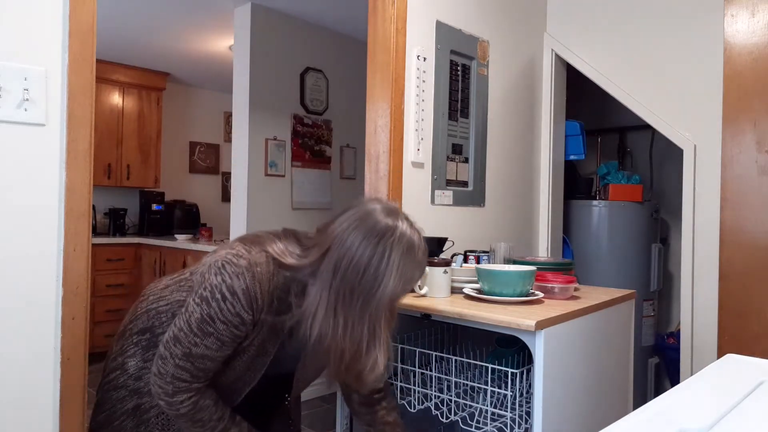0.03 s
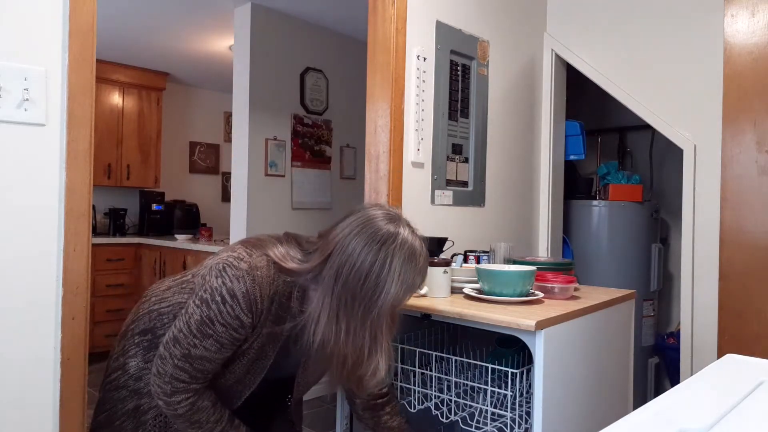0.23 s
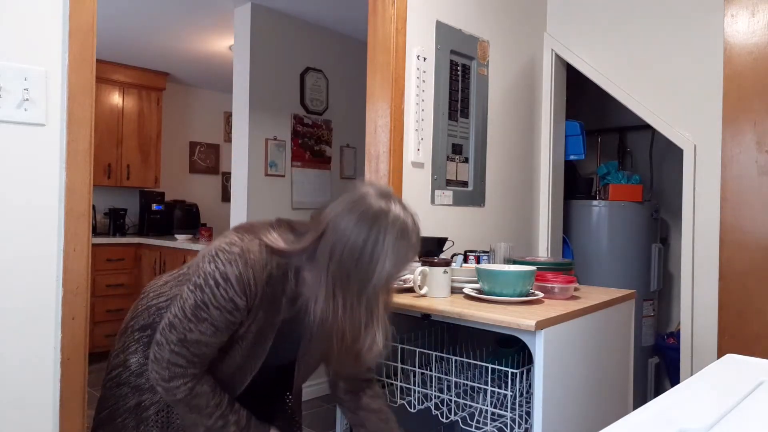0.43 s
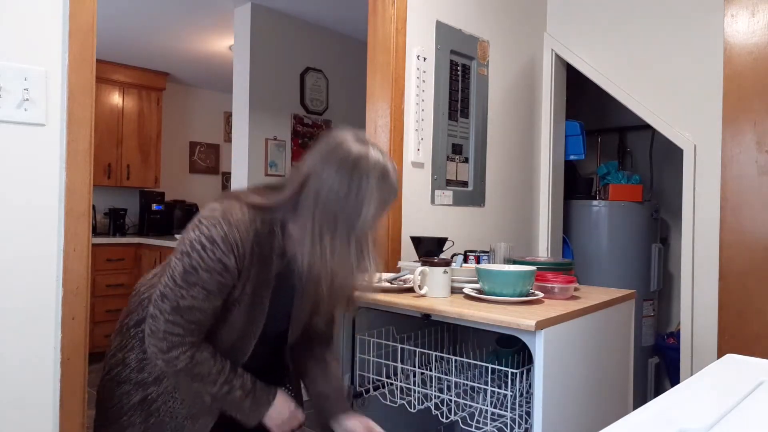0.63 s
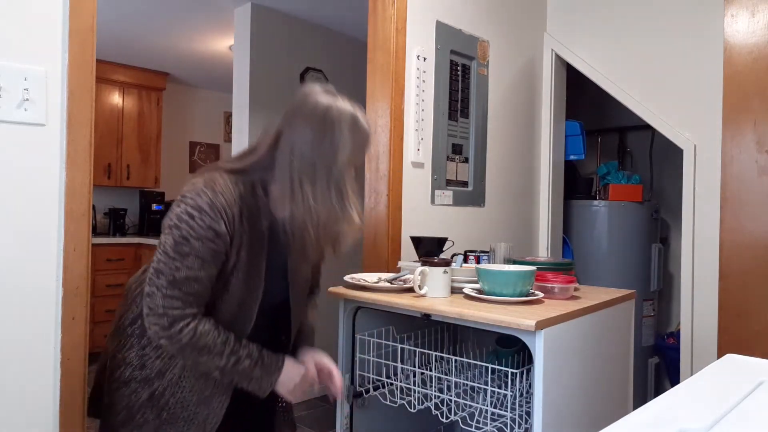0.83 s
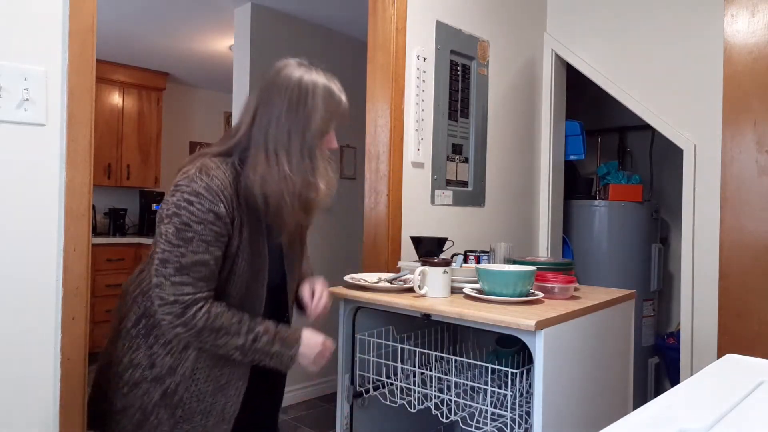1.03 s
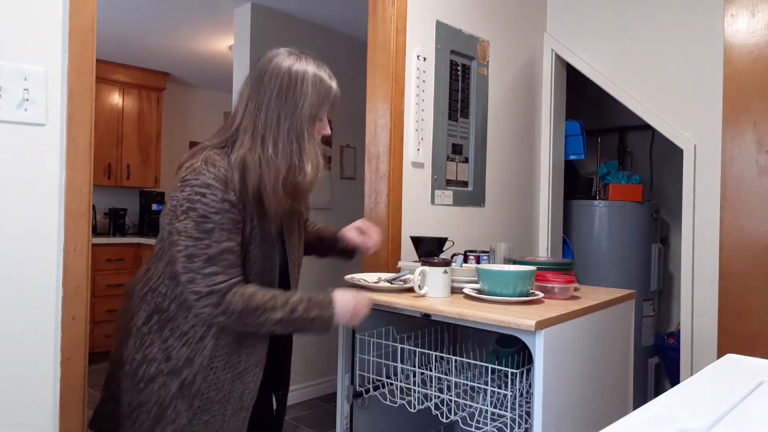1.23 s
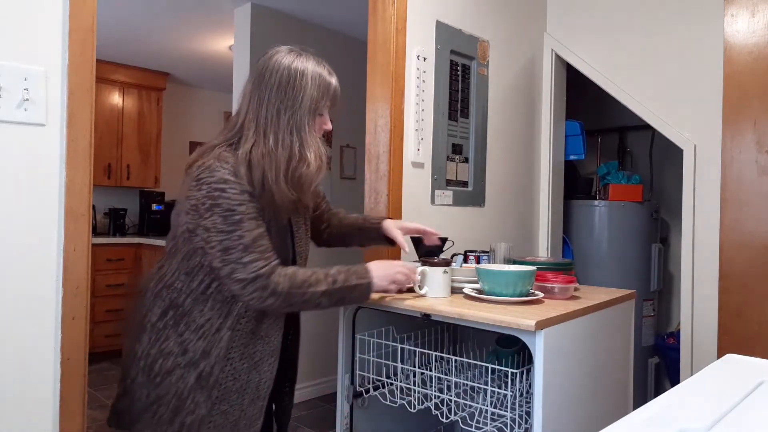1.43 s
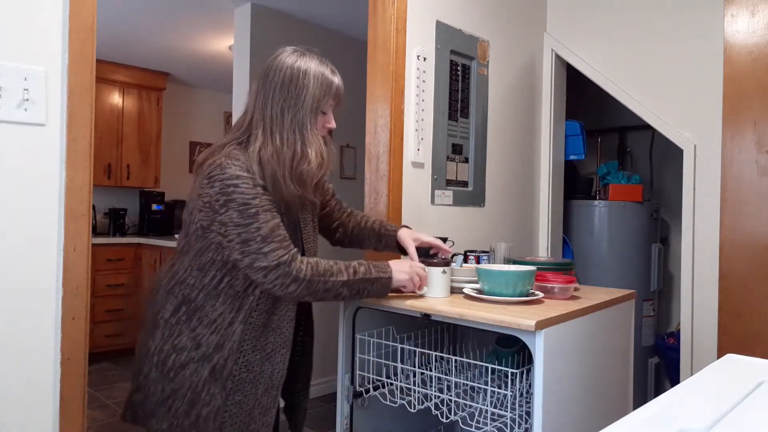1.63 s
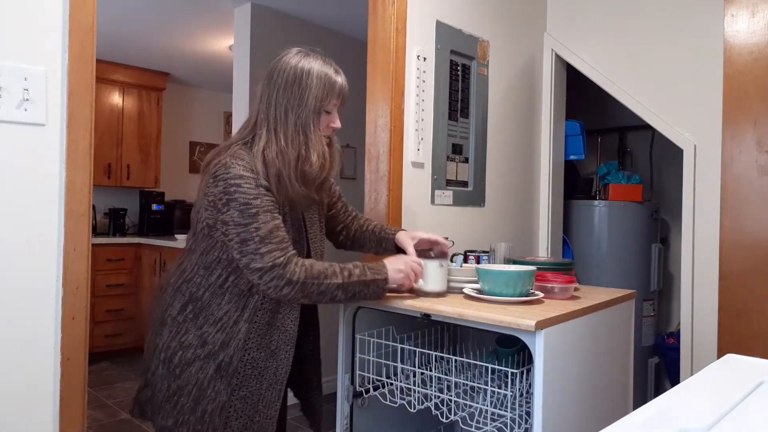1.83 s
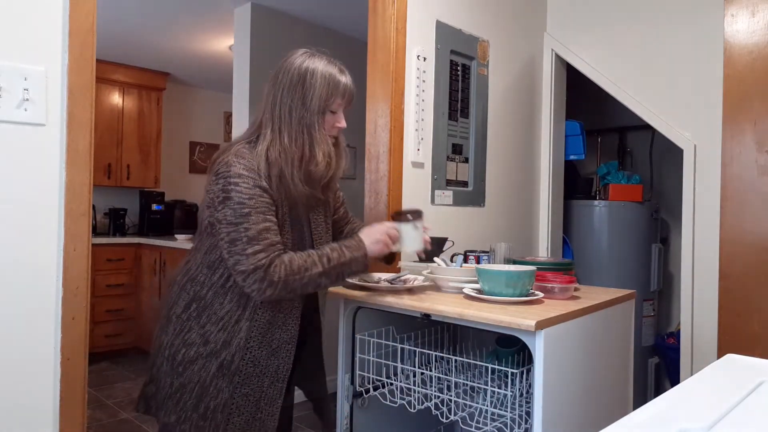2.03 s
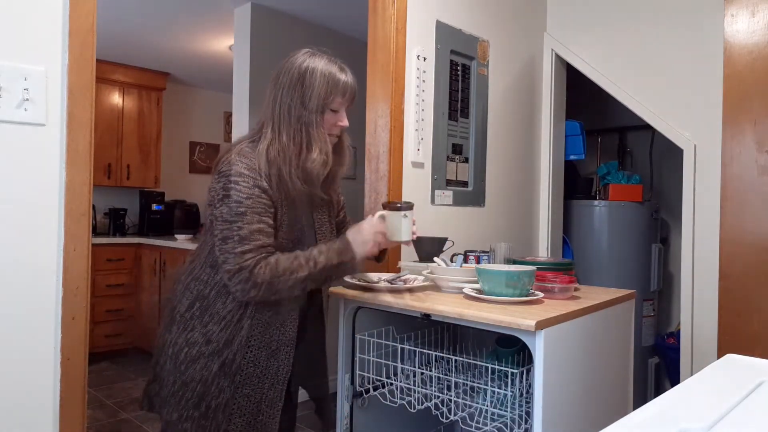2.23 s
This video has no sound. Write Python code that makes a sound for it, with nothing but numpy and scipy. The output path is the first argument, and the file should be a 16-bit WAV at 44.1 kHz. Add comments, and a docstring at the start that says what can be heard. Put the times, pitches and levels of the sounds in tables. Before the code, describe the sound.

In a kitchen, heard from a few metres off, cutlery drops into a dishwasher after light bumps on the rack. A sleeve swishes softly, dishes knock, a cup clacks, the counter thuds, and a mug clinks before a plate rattles briefly.

```python
"""Light bumps on the rack of an open dishwasher, then cutlery drops into its basket, a few metres
from a stereo pair of microphones in a live kitchen. A sleeve swishes, dishes are nudged on the wooden
counter, a hollow cup clacks and the counter thuds. A lifted mug clinks and leaves a plate chattering.
Every contact is a click with small rebounds that sets the object ringing; faint room tone lies below."""
import sys
import numpy as np
from scipy import signal
from scipy.fft import rfft, irfft, next_fast_len
from scipy.io import wavfile
from scipy.ndimage import uniform_filter1d

SR = 44100
rng = np.random.default_rng(int(sys.argv[2]) if len(sys.argv) > 2 else 0)


def unload_wav(signal):
    """Save mono or channel-first audio to the path in sys.argv[1] as 16-bit WAV at rate SR, clipped to [-1, 1]."""
    wavfile.write(
        sys.argv[1],
        SR,
        np.round(np.clip(np.atleast_2d(signal).T, -1, 1) * 32767).astype(np.int16),
    )


N = 101429


def cutlery(spots=3):
    """Metal pieces land in the basket; later a fork clinks faintly on a plate. One track per spot."""
    hits = [(.212, -1.5, -1.5, -14.5, 0.0068), (.234, 1, 4, 0, 0.004), (.256, 0.5, 3.5, -6, 0.015),
            (.289, 7, 8.5, 1, 0.0081), (.312, 4, -19, -13, 0.01), (.335, 2, 3, 6.5, 0.0051),
            (.363, -1, 4.5, 6, .01), (.389, 0, 13, 1.5, 0.018), (.406, -0.5, -5.5, 4.5, 0.0054),
            (.424, 1.5, 5.5, 6, .012), (.45, 1.5, -0.5, 10.5, 0.0041), (.47, 3.5, 5, 2, 0.0058),
            (.5, -6.5, -3.5, -9, 0.018), (.55, -6, -12, -16, 0.011), (1.51, -17.5, -20.5, -36.5, 0.0026)]  # start_s, bass_db, middle_db, treble_db, rebound_s
    knock = [(30, -17.5), (55, -7), (130, 1), (230, 0), (500, 1), (1000, 1.5), (2500, 1.5), (5300, -5),
             (8000, -2.5), (12000, -1), (16000, -7.5)]  # knock colour: frequency_hz, level_db
    modes = [(301.8, 16, 0.19), (779, 4, 0.13), (1598, 1, .02), (1755, -2, 0.015), (4480, 10, 0.016),
             (6171.3, 7, 0.05), (6530, 4, .04), (7980, 3.5, 0.016), (8490, 8.5, 0.021), (10345, -14, 0.02),
             (11700, 6, .09), (13960, 3, 0.021), (14200, 8, 0.029), (14001, 5.5, .04)]  # pitch_hz, level_db, t60_s
    return [struck(hits[k::spots], knock, modes, own_modes=6) for k in range(spots)]


def rack():
    """The dishwasher rack hums briefly after each light bump."""
    bumps = [(.067, -14, -14.5, -29.5, 0.011), (.097, -4.5, -19.5, -38, 0.012), (.15, -16, -49, -42, 0.014),
             (.195, -28, -32, -28, 0.0083), (.61, -29, -18.5, -37, 0.03), (.68, -20.5, -24.5, -42, 0.022)]  # start_s, bass_db, middle_db, treble_db, rebound_s
    knock = [(30, -17.5), (110, 0), (220, -8), (500, -1.5), (1000, 0), (2300, 2), (3700, 4), (6000, 0.5),
             (10000, -3), (16000, -6.5)]  # knock colour: frequency_hz, level_db
    modes = [(320, 14, .14), (1643.8, 4, 0.034), (1997, 4.5, 0.028), (8600, 5, 0.0076)]  # pitch_hz, level_db, t60_s
    return struck(bumps, knock, modes)


def dishes():
    """Nudged dishes knock dully on the counter."""
    nudges = [(1.0, -9, -33.5, -43, 0.013), (1.176, -24.5, -20.5, -25.5, 0.021),
              (1.222, -15.5, -18.5, -24, 0.014), (1.262, -13, -26.5, -31, 0.031),
              (1.329, -12.5, -18.5, -46, 0.013), (1.378, -15.5, -16.5, -49, 0.011),
              (1.406, -18, -23, -21.5, .01), (1.426, -8.5, -20, -17, 0.017), (1.457, -9, -8.5, -30, 0.026),
              (1.5, -8.5, -8, -17, 0.011), (1.515, -1, -16, -95, 0.011), (1.55, -5, -17, -24, 0.037),
              (1.625, -19, -23, -44.5, 0.045)]  # start_s, bass_db, middle_db, treble_db, rebound_s
    knock = [(30, -23), (70, -9), (220, -6), (450, 1.5), (900, -1), (2000, 3), (3500, -4), (6500, -11.5),
             (10000, -14.5), (16000, -19)]  # knock colour: frequency_hz, level_db
    modes = [(166, 6.9, 0.19), (298, 15.7, .15), (821, 1.6, 0.015), (1030, 1.8, 0.036), (2670, 4.4, 0.015),
             (2820, 3, 0.046), (4970, 2, .04), (8500, 2, 0.0085)]  # pitch_hz, level_db, t60_s
    return struck(nudges, knock, modes)


def cup():
    """A hollow cup clacks, its strong modes dying fast."""
    clacks = [(1.703, -27, -12, -26, 0.0073), (1.72, -15, -16.5, -32, 0.0032),
              (1.737, -19, -16.5, -41, 0.0017)]  # start_s, bass_db, middle_db, treble_db, rebound_s
    knock = [(40, -10), (250, 5), (600, 6), (1500, 3.5), (3000, 6), (5000, -17), (9000, 3), (16000, -18.5)]  # knock colour: frequency_hz, level_db
    modes = [(520, 3.6, 0.037), (800, 13.4, 0.02), (921, 23.8, 0.035), (2809, 23.3, 0.11), (2886, 15, .07),
             (3850, 15.7, 0.028), (3790, 20, 0.041), (5064.3, 32.4, 0.044), (6470, 15, 0.033),
             (6940, 12, 0.0806), (7650, 8.4, 0.035), (8280, 8, 0.03307), (9242.5, 12.6, 0.059),
             (10751, 14, 0.061), (11900, 13, .06), (13780, 13, .08)]  # pitch_hz, level_db, t60_s
    return struck(clacks, knock, modes)


def counter():
    """The wooden counter thuds in its low modes."""
    thuds = [(1.79, 3, -1.5, -21, 0.0061), (1.801, 2, -1, -16.5, 0.0072), (1.819, -1.5, -8.5, -26, 0.013)]  # start_s, bass_db, middle_db, treble_db, rebound_s
    knock = [(30, -29), (65, -3.5), (130, -3.5), (200, 0.5), (400, -2.5), (650, -8.5), (1000, -4),
             (2300, -1), (4000, -8), (7000, -5.5), (12000, -2.5), (16000, -11.5)]  # knock colour: frequency_hz, level_db
    modes = [(144, 5, 0.14), (180, 2.8, 0.26), (314, 12.3, 0.076), (384.7, 4, 0.15), (627, 11.6, 0.061)]  # pitch_hz, level_db, t60_s
    return struck(thuds, knock, modes)


def mug():
    """A lifted mug clinks twice and rings high."""
    clinks = [(1.835, -9, -17, -11.5, 0.0027), (1.846, -8, -18, -19, 0.0089)]  # start_s, bass_db, middle_db, treble_db, rebound_s
    knock = [(100, 5), (1000, 9), (2600, 10.5), (5000, -2.5), (10000, -3.5), (16000, -5.5)]  # knock colour: frequency_hz, level_db
    modes = [(4856, 16.7, .1), (6520, 17, 0.075), (6900, 21, 0.12), (7930, 16, 0.12), (9000, 19, 0.022),
             (9330, 23, 0.0542), (10110, 20, 0.045), (12100, 18, 0.038), (12490, 13, 0.0676),
             (13600, 21, .1), (14000, 17, .1), (14350, 20, .1), (15130, 22, .1)]  # pitch_hz, level_db, t60_s
    return struck(clinks, knock, modes)


def plate():
    """A plate chatters in a fading run of knocks."""
    hits = [(1.86, 0, -6.5, -14, 0.033), (1.918, -1, -2.5, -14.5, .006), (1.962, 0, -3, -25, 0.022),
            (2.005, -2.5, -5, -19.5, 0.0086), (2.045, -4, -6, -26.5, 0.017), (2.09, -5, -13.5, -26, 0.033),
            (2.147, -9, -23, -25, 0.014), (2.202, -5, -21, -33.5, 0.0049)]  # start_s, bass_db, middle_db, treble_db, rebound_s
    knock = [(30, -16), (65, -6), (140, -2.5), (240, -7), (500, -3.5), (1200, -2), (2800, -2.5),
             (4000, -4.5), (7000, -8), (12000, -6), (16000, -19)]  # knock colour: frequency_hz, level_db
    modes = [(149, 5.8, 0.12), (322, 4.24, 0.063), (663, 1.3, 0.066), (1100, 1.9, 0.067), (2315, 7.8, 0.05),
             (2866, 7.7, 0.034), (4680, 9.9, 0.01333), (5200, 3, 0.11), (6220, 3.036, 0.037),
             (8300, 3.6, 0.015), (8907, 5, 0.032)]  # pitch_hz, level_db, t60_s
    return struck(hits, knock, modes)


def rims():
    """A rim chatters briefly against its neighbour and rings out on one note."""
    pings = [(0.238, 4570, -27, 0.046), (0.344, 4625, -36, .03), (1.172, 2880, -55, .09),
             (1.255, 11950, -69.5, .1), (1.426, 14950, -57, .06), (1.507, 4484, -46.5, 0.042),
             (1.914, 3020, -41, 0.057), (1.976, 4660, -49, 0.081), (2.085, 2388, -57.5, 0.36),
             (2.147, 4930, -58, 0.085)]  # start_s, pitch_hz, level_db, t60_s
    out, t = np.zeros(N), np.arange(N // 4) / SR
    for start_s, pitch_hz, level_db, t60_s in pings:
        note = from_db(-60 * t / t60_s) * np.sin(2 * np.pi * pitch_hz * t)
        ring = signal.fftconvolve(note, contact(rebound_s=0.0053, size=4096, lead=0))
        start = int(start_s * SR)
        out[start:start + len(ring)] += (from_db(level_db) * ring / abs(ring).max())[:N - start]
    return out


def struck(hits, knock, modes, own_modes=0, size=16384, lead=256):
    """Each contact gives a dry knock and excites the modes anew; own_modes more are drawn per hit."""
    bands_hz, spread_db = (200, 1500, 9000), 2
    own_range_hz, own_db, own_t60_s = (2188, 15560), 6.5, 0.056
    out, hz = np.zeros(N + size), np.fft.rfftfreq(size, 1 / SR)
    body = resonances(modes, hz)
    for start_s, *levels_db, rebound_s in hits:
        strengths = from_db(spread_db * rng.standard_normal((len(modes), 1)))
        response = 1 + (strengths * body).sum(0)  # the 1 is the dry knock
        if own_modes:
            pitches = rng.uniform(*own_range_hz, own_modes)
            response += resonances([(f, own_db, own_t60_s) for f in pitches], hz).sum(0)
        colour = from_db(at_hz(knock, hz) + at_hz(list(zip(bands_hz, levels_db)), hz))
        start = int(start_s * SR) - lead
        out[start:start + size] += irfft(rfft(contact(rebound_s, size, lead)) * colour * response)
    return out[:N]


def contact(rebound_s, size, lead):
    """Force of one contact: a click, `lead` samples in, and a dying run of uneven rebounds; energy 1."""
    touch_db, rebound_db, spread_db = -4.5, -9, 5.5
    rebounds_per_s, rise_s = 700, 0.0017
    t = np.maximum(np.arange(size) - lead, 0) / SR
    rebounds = rng.random(size) < rebounds_per_s / SR
    strengths = from_db(rebound_db + spread_db * rng.standard_normal(size)) * rng.choice([-1, 1], size)
    envelope = (1 - np.exp(-t / rise_s)) * np.exp(-(t / rebound_s) ** 2 / 2)
    clicks = rebounds * strengths * envelope
    clicks[lead] = from_db(touch_db)
    return clicks / np.linalg.norm(clicks)


def resonances(modes, hz):
    """Frequency response of damped modes, one row each."""
    pitch_hz, level_db, t60_s = np.transpose(modes)[:, :, None]
    damping = 1j * hz * np.log(1000) / (np.pi * t60_s)
    return from_db(level_db) * damping / (pitch_hz ** 2 - hz ** 2 + damping)


def sleeve():
    """Cloth swishes as the arm comes up."""
    swell = [(.93, -90), (1.0, -72), (1.025, -63), (1.065, -63.5), (1.121, -75), (1.18, -76)]  # time_s, level_db
    colour = [(100, -20), (400, 5), (1000, 9.5), (2500, -4), (5000, 0), (7000, -1), (9000, 4.5),
              (12000, -5), (16000, -16)]  # frequency_hz, level_db
    time_s, level_db = np.transpose(swell)
    return np.interp(np.arange(N) / SR, time_s, from_db(level_db), left=0, right=0) * hiss(colour)


def kitchen(x, size=32768, bands=12):
    """A few metres off: weak direct sound, left microphone first, and a dense tail longest in the bass."""
    reverb_times = [(60, 0.46), (150, .5), (300, 0.1728), (700, 0.19), (2000, 0.2), (5000, 0.22),
                    (9000, .27), (15000, 0.2041)]  # frequency_hz, t60_s
    direct_db, right_lag_s = -14.5, .00007
    build_s, tail_s, smoothing_hz = 0.0034, .55, 45
    t, hz = np.arange(size) / SR, np.fft.rfftfreq(size, 1 / SR)
    noise, tail = rfft(diffuse_noise(size)), np.zeros((2, size))
    centres = np.geomspace(60, 15000, bands)
    for centre, share in zip(centres, np.eye(bands)):
        decay = from_db(-60 * t / at_hz(reverb_times, centre))
        tail += irfft(noise * at_hz(list(zip(centres, share)), hz), size) * decay
    spectrum = rfft(tail)
    power = uniform_filter1d(np.mean(abs(spectrum) ** 2, 0), int(smoothing_hz * size / SR))
    even_tail = irfft(spectrum / np.sqrt(power))
    response = even_tail * (1 - np.exp(-t / build_s)) * (t < tail_s)
    response /= np.linalg.norm(response, axis=1, keepdims=True)
    response[0, 0] += from_db(direct_db)
    response[1, int(right_lag_s * SR)] += from_db(direct_db)
    return signal.fftconvolve(x[None], response, axes=1)[:, :N]


def room_tone(level_db=-71):
    """The kitchen's faint, steady rumble and hiss."""
    colour = [(20, -22.5), (40, -8.5), (65, 8), (95, -4), (135, 7), (220, -9), (310, -3.5), (450, -15),
              (1000, -18), (2500, -18.5), (6800, -30.5), (8600, -21.5), (11000, -26), (16000, -24)]  # frequency_hz, level_db
    return from_db(level_db) * hiss(colour)


def hiss(colour):
    """Diffuse noise of a given colour, rms 1."""
    size = next_fast_len(N)
    gain = from_db(at_hz(colour, np.fft.rfftfreq(size, 1 / SR)))
    noise = irfft(rfft(diffuse_noise(size)) * gain, size)[:, :N]
    return noise / noise.std()


def diffuse_noise(size):
    """Noise at the two microphones, alike in the bass and unrelated in the treble."""
    stereo_width = [(60, -11.5), (150, -14.5), (320, -9.5), (700, -4), (1300, 0.5), (15000, -0.5)]  # frequency_hz, side_over_mid_db
    mid, side = rfft(rng.standard_normal((2, size)))
    width = from_db(at_hz(stereo_width, np.fft.rfftfreq(size, 1 / SR)))
    return irfft((mid + width * side * np.array([[1], [-1]])) / np.sqrt(1 + width ** 2), size)


def from_db(db):
    """Decibels to gain."""
    return 10 ** (np.asarray(db) / 20)


def at_hz(points, hz):
    """Read a table on a log-frequency axis."""
    f, value = np.transpose(points)
    return np.interp(np.log(np.maximum(hz, 1)), np.log(f), value)


def scene(left_over_right_db=1.28):
    """Each object reaches the microphones by its own paths through the room."""
    sources = cutlery() + [rack(), dishes(), cup(), counter(), mug(), plate() + rims()]
    clatter = sum(kitchen(x) for x in sources)
    balance = from_db([[left_over_right_db / 2], [-left_over_right_db / 2]])
    return (clatter + sleeve() + room_tone()) * balance


def record(dry, cutoff_hz=15950):
    """The top of the treble is cut steeply."""
    return signal.sosfilt(signal.ellip(12, .2, 80, cutoff_hz, fs=SR, output="sos"), dry)


dry = scene()
out = record(dry)
unload_wav(out)
```